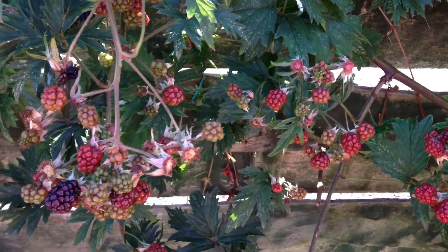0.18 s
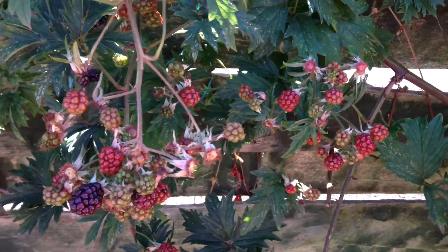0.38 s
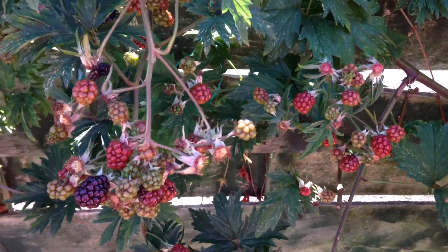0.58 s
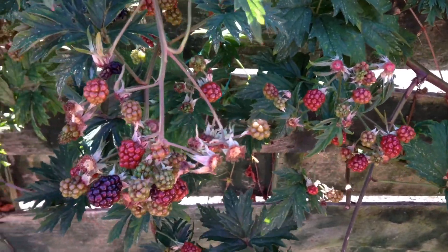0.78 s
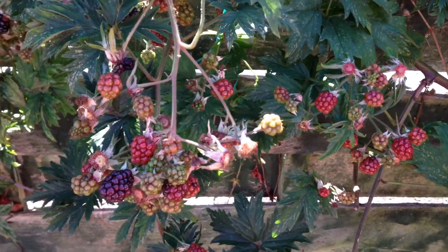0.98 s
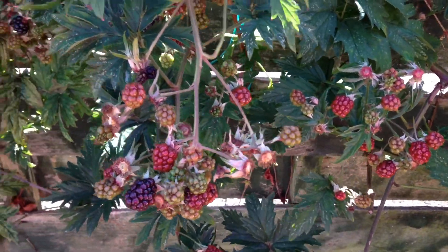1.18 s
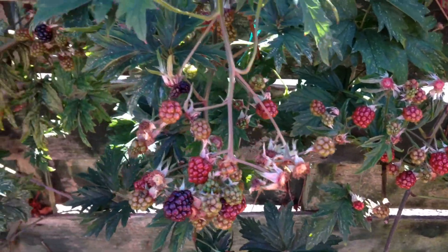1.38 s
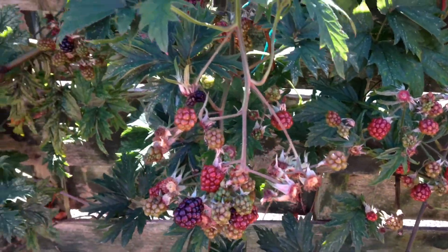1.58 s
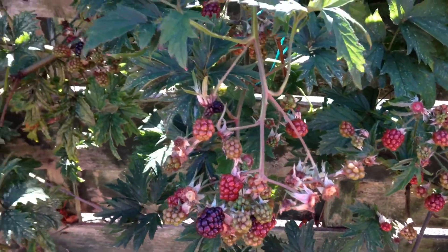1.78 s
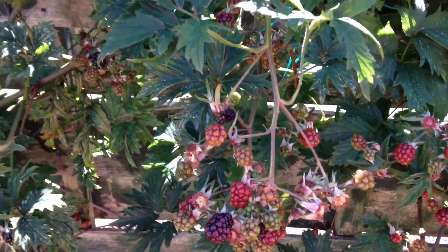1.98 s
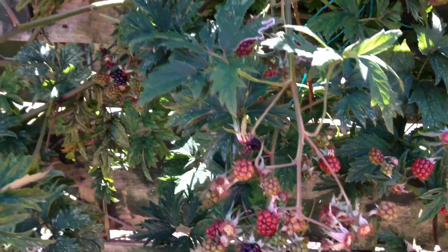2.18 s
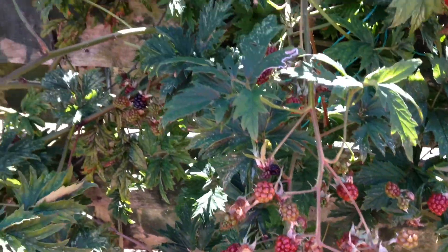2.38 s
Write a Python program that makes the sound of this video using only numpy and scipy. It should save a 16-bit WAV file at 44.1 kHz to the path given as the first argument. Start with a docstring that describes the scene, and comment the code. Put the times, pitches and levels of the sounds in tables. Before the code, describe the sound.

Wind blowing on a microphone in irregular rumbling bursts, popping and crackling, with faint garden hiss

```python
"""Wind on a small microphone

Gusty wind buffets a small microphone in a garden: eddies roll over the port as lumpy low noise that
brightens with wind speed, the hardest ones pop and the fastest crack. Leaves rustle in short bursts
over a faint garden hiss. Noise layers are random short-time spectra; pops and cracks are short pulses."""
import sys
import numpy as np
from scipy import signal
from scipy.fft import rfft, irfft
from scipy.io import wavfile
from scipy.ndimage import uniform_filter1d

SR = 44100
rng = np.random.default_rng(int(sys.argv[2]) if len(sys.argv) > 2 else 0)


def bounce(signal):
    """Save signal as a 16-bit WAV file at the path given by the first command-line argument."""
    frames = np.transpose(np.atleast_2d(signal))
    limited = np.clip(frames, -1, 1)
    pcm = np.round(limited * 32767).astype(np.int16)
    wavfile.write(sys.argv[1], SR, pcm)


def boost(x):
    """Linear amplitude factor 10**(x/20) for a level x in decibels (scalar or array-like)."""
    u = np.asarray(x, float) / 20
    return 10 ** u


N = 112455


def unit_rms(x):
    """Normalization: scales a signal to unit root-mean-square value."""
    return x / np.sqrt(np.mean(x ** 2) + 1e-20)


def read_log(points, hz):
    """Logarithmic frequency scale: interpolates a (frequency, value) table along it."""
    f, value = np.transpose(points)
    return np.interp(np.log(hz + 1), np.log(f + 1), value)


def drift(low_hz, top_hz):
    """Band-limited random modulation: white noise filtered in the spectrum, at unit rms."""
    spectrum = rfft(rng.standard_normal(N))
    f = np.fft.rfftfreq(N, 1 / SR)
    high_pass = f / np.sqrt(f ** 2 + low_hz ** 2)
    low_pass = 1 / np.sqrt(1 + (f / top_hz) ** 4)
    return unit_rms(irfft(spectrum * high_pass * low_pass, N))


def lumps(depth_db, low_hz, top_hz):
    """Amplitude modulation: a random gain whose swing saturates at twice depth_db either way."""
    return boost(depth_db * 2 * np.tanh(drift(low_hz, top_hz) / 2))


def stft_axes(size):
    """Short-time analysis: bin frequencies [Hz] as a column and frame times [s] as a row."""
    hop = size / 4
    return np.fft.rfftfreq(size, 1 / SR)[:, None], np.arange(N * 4 // size + 5) * hop / SR


def shaped_noise(gain, size):
    """Short-time spectral synthesis: random complex bins weighted by gain, then overlap-added."""
    real, imaginary = rng.standard_normal((gain.shape[1], gain.shape[0], 2)).T
    return signal.istft((real + 1j * imaginary) * gain, nperseg=size, noverlap=size * 3 // 4)[1][:N]


def steady_noise(spectrum, size):
    """Stationary random process: noise with one power spectrum in all frames."""
    hz, t = stft_axes(size)
    return shaped_noise(boost(read_log(spectrum, hz)) * np.ones_like(t), size)


# spectral shape of the garden hiss: (frequency [Hz], relative density [dB per Hz])
GARDEN_SPECTRUM = [(40, -4.5), (300, -2), (900, 6.5), (2400, -0.5), (4500, 0), (7000, -5), (10000, -9.5),
                   (15500, -11.5)]
# loudness course of the hiss before its random swell: (time [s], level [dB])
HISS_LEVEL = [(0.0, -56.5), (0.4, -59), (0.58, -54.5), (0.7, -65), (0.96, -62), (1.19, -59), (1.46, -60.5),
              (1.95, -58.5), (2.55, -58)]


def garden():
    """Stationary noise under slow amplitude modulation: distant foliage hiss, gently swelling."""
    swell_db = 1.44 * drift(1.5, 12)
    level_db = np.interp(np.arange(N) / SR, *np.transpose(HISS_LEVEL)) + swell_db
    return boost(level_db) * unit_rms(steady_noise(GARDEN_SPECTRUM, size=1024))


# leaf bursts: (onset [s], level before the common leaf gain [dB], decay length [factor])
LEAF_BURSTS = [(0.1012, -38.5, 0.39), (0.385, -49, 0.53), (0.4993, -19, 0.89), (0.5831, -36, 0.61),
               (1.6894, -60, 0.79), (1.829, -51, 0.9), (2.2603, -53, 1), (2.4904, -43.5, 0.32)]
# spectral shape of rustling leaves: (frequency [Hz], relative density [dB per Hz])
LEAF_SPECTRUM = [(710, -31.5), (1200, -18.5), (1750, -8.5), (2890, -16.5), (3180, -14), (4830, -12),
                 (14400, -46.5), (15500, -48.5)]
# time for a burst of length 1 to fall by 60 dB: (frequency [Hz], decay time [s])
LEAF_DECAY = [(1000, .35), (2000, 0.47), (4000, 0.19), (8000, 0.2), (15000, .14)]


def leaves():
    """Frequency-dependent decay: grainy bursts with a soft lead-in, a quick onset, treble dying first."""
    rise_s, lead_s, lead_db = 0.0018, 0.012, -25.5
    leaf_db, grain_db = -5, 1
    hz, t = stft_axes(size=128)
    power = np.full((len(hz), len(t)), 1e-14)
    for onset, level_db, length in LEAF_BURSTS:
        after = np.maximum(t - onset, 0)
        rise = np.clip((t - onset) / rise_s, 0, 1)
        lead_in = boost(lead_db) * np.exp(np.minimum(t - onset, 0) / lead_s)
        t60 = max(length, 0.1) * read_log(LEAF_DECAY, hz)
        power += ((rise + lead_in) * boost(level_db - 60 * after / t60)) ** 2  # bursts add in power
    colour = boost(read_log(LEAF_SPECTRUM, hz))
    colour = colour / np.sqrt((colour ** 2).sum())
    bursts = shaped_noise(colour * np.sqrt(power), size=128)
    return boost(leaf_db) * bursts * boost(grain_db * drift(60, 500))


# slow pressure on the port: (time [s], rumble level [dB])
SLOW_PRESSURE = [(0.0, -57), (0.05, -29.5), (0.1, -54), (0.15, -31.5), (0.23, -22.5), (0.28, -37),
                 (0.33, -27.5), (0.39, -53.5), (0.5, -23.5), (0.62, -27), (0.67, -16.5), (0.81, -34.5),
                 (1.11, -21), (1.16, -40), (1.18, -20), (1.2, -16.5), (1.24, -29.5), (1.27, -19),
                 (1.35, -32.5), (1.37, -39.5), (1.44, -31), (1.49, -54), (1.53, -31), (1.59, -41),
                 (1.61, -33), (1.77, -28.5), (1.82, -19.5), (1.85, -35.5), (1.89, -21.5), (1.95, -32),
                 (1.99, -23.5), (2.01, -28.5), (2.16, -15.5), (2.19, -27), (2.24, -19.5), (2.32, -36),
                 (2.36, -23), (2.4, -40.5), (2.44, -32.5), (2.55, -31)]
# spectral shape of the large eddies: (frequency [Hz], relative density [dB per Hz])
RUMBLE_SPECTRUM = [(15, -59), (30, -35), (50, -10.5), (70, -1), (120, -4.5), (180, -5), (300, -19.5),
                   (600, -81.5)]


def rumble():
    """Low-frequency pressure fluctuation: large slow eddies lean on the diaphragm."""
    s, level_db = np.transpose(SLOW_PRESSURE)
    low = steady_noise(RUMBLE_SPECTRUM, size=2048) * lumps(4, 12, 25)
    return unit_rms(low) * boost(np.interp(np.arange(N) / SR, s, level_db))


def pushes(rows, gain_db, build_s):
    """Pressure pulse: a cosine under a hyperbolic-secant envelope, one outward push between two swings."""
    out, t = np.zeros(N), np.arange(N) / SR
    for s, peak_db, hz, cycles in rows:
        near = slice(max(round(s * SR) - 1100, 0), round(s * SR) + 1300)
        phase = (t[near] - s - build_s) * hz  # in cycles from the peak
        envelope = 1 / np.cosh(2 * phase / np.clip(cycles, 0.27, 1.3))
        out[near] += boost(peak_db + gain_db) * np.cos(2 * np.pi * phase) * envelope
    return signal.sosfilt(signal.butter(2, 60, "high", fs=SR, output="sos"), out)


# thin cracks at the top of the fastest eddies:
# (onset [s], peak before the common gain [dB], frequency [Hz], length [cycles])
EDDY_CRACKS = [(0.2254, -45, 1300, 0.93), (0.4524, -37, 1310, 0.45), (0.6224, -30, 1500, 0.45),
               (0.6625, -14.5, 1510, 0.51), (0.69, -33.5, 1370, 0.39), (0.7026, -6.5, 1380, 0.19),
               (0.7176, -29, 1300, 0.36), (0.726, -20, 1350, 0.55), (0.7846, -32.5, 1500, 0.88),
               (0.8724, -29, 1360, 0.67), (1.0011, -38, 1730, 0.45), (1.0159, -19, 1760, 0.59),
               (1.0324, -19.5, 1310, 0.36), (1.0514, -38, 1470, 0.56), (1.072, -18.5, 1300, 0.29),
               (1.0844, -39, 1460, 0.45), (1.1029, -23, 1510, 0.96), (1.1156, -24.5, 1580, 0.62),
               (1.1943, -29, 1320, 0.61), (1.21, -19, 1310, 0.7), (1.2371, -17, 1780, 0.65),
               (1.2982, -16, 1300, 0.51), (1.3163, -19.5, 1396, 0.74), (1.6259, -34, 1570, 0.64),
               (1.8856, -39, 1560, 0.32), (2.075, -42, 1310, 0.45), (2.1063, -19, 1430, 0.89),
               (2.145, -30.5, 1400, 1), (2.237, -29, 1360, 1), (2.26, -38, 1480, 0.71)]


def cracks():
    """Short pressure pulse: each fast eddy cracks, peaking a little after its onset."""
    return pushes(EDDY_CRACKS, gain_db=2, build_s=0.001507)


# single hard eddies: (peak time [s], peak before the common gain [dB], frequency [Hz], length [cycles])
EDDY_POPS = [(0.2321, -7, 438.0, 0.68), (0.5618, -10.5, 371.0, 0.44), (0.6076, -10, 383.0, 0.36),
             (0.6244, -3.5, 460, 0.65), (0.6609, -1.5, 554, 0.55), (0.6744, -6, 438.0, 0.55),
             (0.6972, -1, 348, 0.67), (0.7044, -5, 688, 0.4), (0.7316, -6, 473, 0.62),
             (0.7862, -6.5, 322.0, 0.52), (0.8568, -13, 360.0, 0.46), (0.8899, -17.5, 533.0, 0.88),
             (1.025, -8.5, 277, 0.55), (1.0382, -7.7, 471.0, 0.76), (1.0906, -12, 219.0, 0.6),
             (1.1085, -6, 400, 0.41), (1.2113, -1.5, 490.0, 0.64), (1.2409, -5, 395.0, 0.7),
             (1.3006, 1, 349, 0.66), (1.3176, 0.5, 400, 0.6), (1.6287, -10.5, 299.0, 0.72),
             (1.6779, -12.5, 395.0, 0.72), (1.718, -10, 287, 0.69), (1.8075, -19, 153, 0.46),
             (1.8872, -7.2, 287, 0.48), (1.9821, -9.5, 268, 0.55), (2.0001, -13, 314.0, 0.58),
             (2.0168, -10, 383.0, 0.61), (2.0762, -8.5, 383.0, 0.46), (2.0941, -7, 168.0, 0.81),
             (2.1063, -13, 360.0, 0.36), (2.1183, -5.0, 292.0, 0.91), (2.1503, -4, 160, 0.99),
             (2.261, -9, 440, 0.81), (2.444, -12.5, 304, 0.49)]


def pops():
    """Impulsive pressure: each hard eddy strikes the port as one low pop."""
    return pushes(EDDY_POPS, gain_db=-1, build_s=0)


# wind on the port: (time [s], buffeting level [dB], treble share that sets the wind speed [dB])
WIND = [(0.0, -61, -7.5), (0.02, -57, 4), (0.05, -46.5, -30.5), (0.11, -59, 3), (0.15, -32, -34),
        (0.21, -29.5, -23.5), (0.23, -9.5, -17), (0.25, -39, -31.5), (0.27, -63, -22.5),
        (0.3, -24.5, -31.5), (0.33, -25.5, -30), (0.38, -77, -3), (0.45, -20, -27.5), (0.48, -31, -31),
        (0.51, -29.5, 0), (0.57, -18.5, -26.5), (0.58, -23, -9.5), (0.62, -11, -19), (0.65, -27, -13.5),
        (0.67, -9, -3.5), (0.68, -6, -45.5), (0.7, -10, -3), (0.77, -23.5, -27.5), (0.79, -21, -20.5),
        (0.81, -39.5, -23.5), (0.87, -15, -16.5), (0.99, -27.5, -17.5), (1.02, -10.5, -15),
        (1.11, -16, -14.5), (1.14, -27, -17), (1.17, -43, -12), (1.21, -10, -10.5), (1.28, -27.5, -20.5),
        (1.3, -12, -9), (1.32, -10, -19.5), (1.36, -49, -20.5), (1.43, -38, -20), (1.48, -68, 1),
        (1.55, -33, -32.5), (1.58, -55, -20.5), (1.62, -20.5, -24), (1.73, -34, -26.5), (1.79, -49, -23),
        (1.8, -31, -28), (1.85, -57, -18.5), (1.88, -24.5, -27), (1.97, -43, -27), (1.98, -23, -26.5),
        (2.07, -30, -23), (2.07, -19, -13), (2.15, -15.5, -24), (2.17, -35, -31), (2.23, -33.5, -19),
        (2.26, -10, -14.5), (2.32, -54.5, -26.5), (2.34, -35, -25), (2.42, -49.5, -11), (2.44, -26, -35),
        (2.53, -43.5, -22.5), (2.55, -30.5, -18)]
# eddy spectrum at relative speed 1: (frequency [Hz], relative density [dB per Hz])
EDDY_SPECTRUM = [(59, -40.5), (100, -1), (275, -3), (513, 2.5), (719, -7), (829, -9), (1360, -19),
                 (2170, -38.5), (7000, -76), (9100, -98.5), (15400, -120)]


def buffeting():
    """Convected turbulence: faster flow slides the eddy spectrum up; lumps push outward more than inward."""
    db_per_octave, strong_db = 17, -11  # treble share rises as the wind speeds up; strong_db is speed 1
    patch_db, lump_db, lump_hz, skew = 1.5, 5.5, 103, 0.099
    s, level_db, treble_db = np.transpose(WIND)
    hz, t = stft_axes(size=256)
    speed = np.interp(t, s, np.clip(2 ** ((treble_db - strong_db) / db_per_octave), 0.35, 1.4))
    gain = boost(read_log(EDDY_SPECTRUM, hz / speed))
    # each frame has equal power between 200 and 900 Hz
    gain = gain / np.sqrt((gain ** 2 * (hz > 200) * (hz < 900)).sum(0))
    patches = rng.standard_normal(gain.shape[::-1]).T
    patches = uniform_filter1d(patches, size=2, axis=0)
    patches = unit_rms(uniform_filter1d(patches, size=8, axis=1))
    flow = unit_rms(shaped_noise(gain * boost(patch_db * patches), size=256))
    flow = unit_rms(flow * lumps(lump_db, 30, lump_hz))
    flow = flow + skew * flow * np.tanh(flow / 2)  # outward lumps grow, inward ones shrink
    flow = signal.sosfilt(signal.butter(2, 90, "high", fs=SR, output="sos"), flow)
    level = uniform_filter1d(np.interp(np.arange(N) / SR, s, level_db), size=150)
    return unit_rms(flow) * boost(level)


def scene():
    """Superposition: the pressures of all layers add at one microphone."""
    return (garden() + leaves() + rumble() + cracks() + pops() + buffeting())[None]


def top_cut(x):
    """Nothing passes above the cut-off."""
    return signal.sosfilt(signal.butter(12, 15720, fs=SR, output="sos"), x)


def record(dry):
    """Saturation: soft overload of the input, bending peaks toward a ceiling."""
    ceiling = 0.97  # of full scale
    mix = dry / (1 + abs(dry / ceiling) ** 4) ** (1 / 4)
    return top_cut(mix)


dry = scene()
out = record(dry)
bounce(out)
```